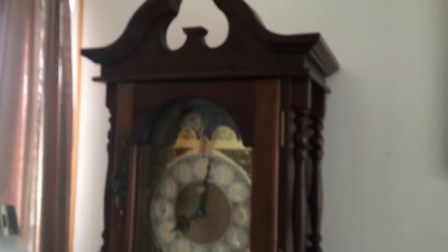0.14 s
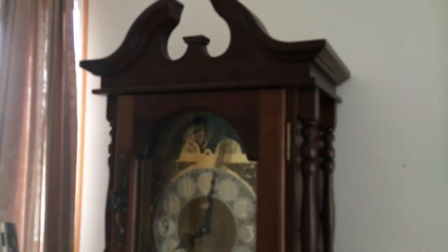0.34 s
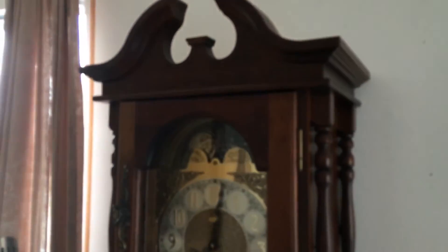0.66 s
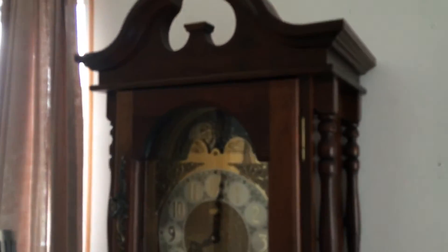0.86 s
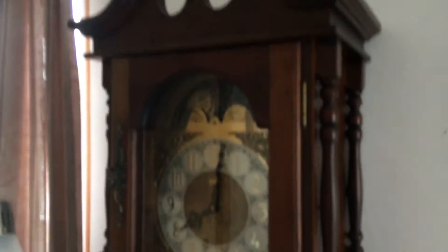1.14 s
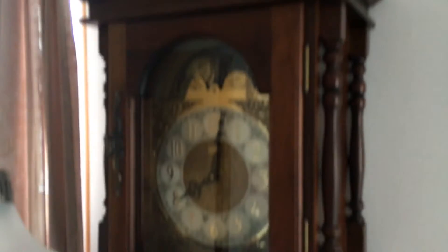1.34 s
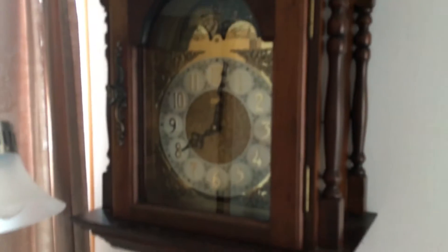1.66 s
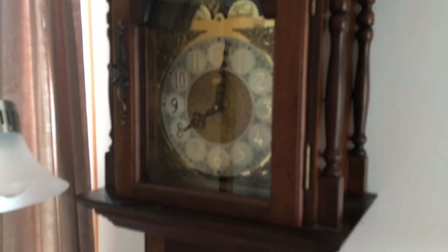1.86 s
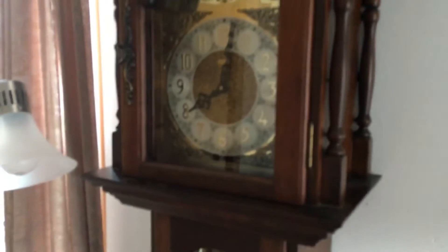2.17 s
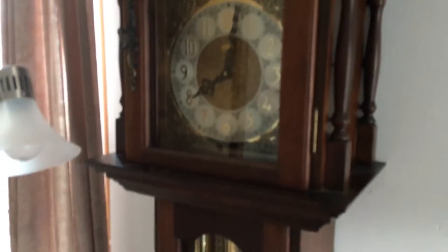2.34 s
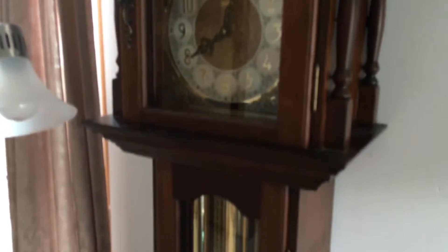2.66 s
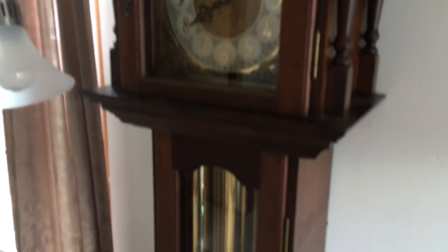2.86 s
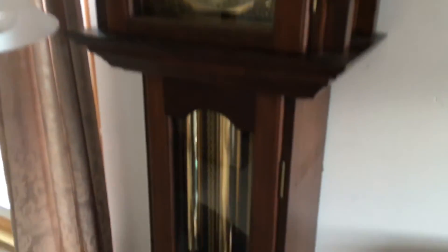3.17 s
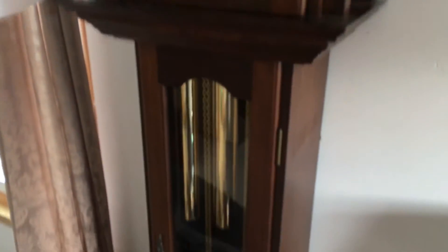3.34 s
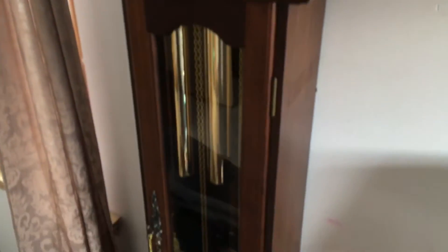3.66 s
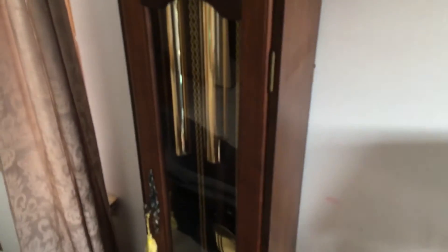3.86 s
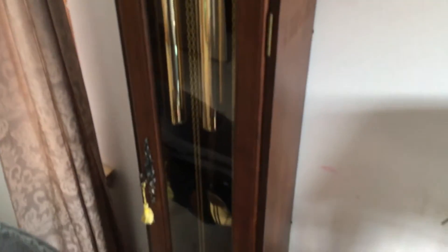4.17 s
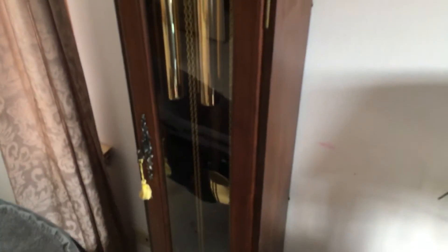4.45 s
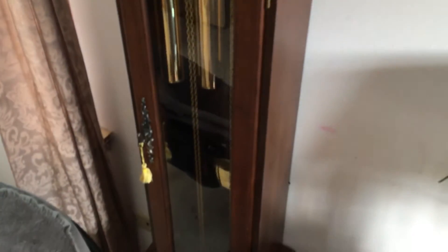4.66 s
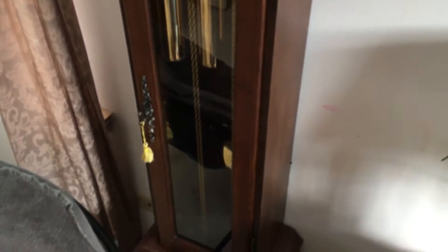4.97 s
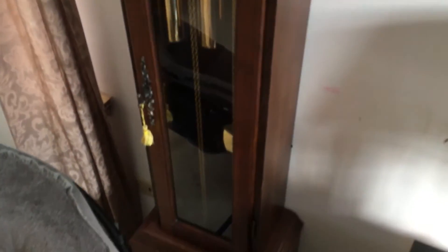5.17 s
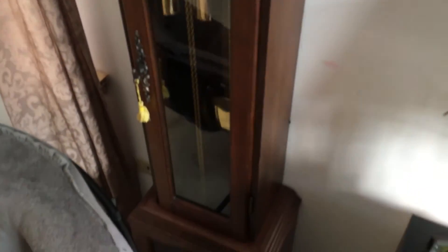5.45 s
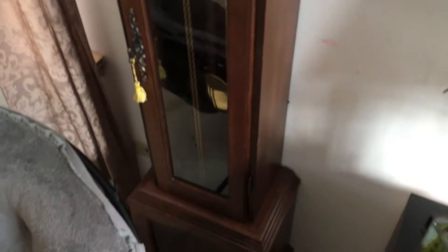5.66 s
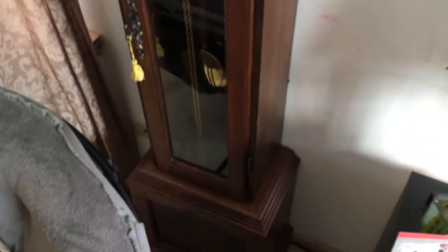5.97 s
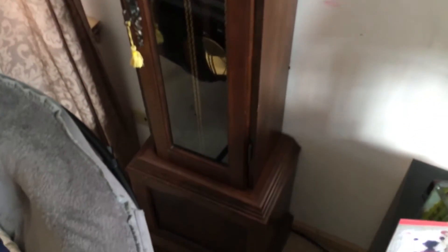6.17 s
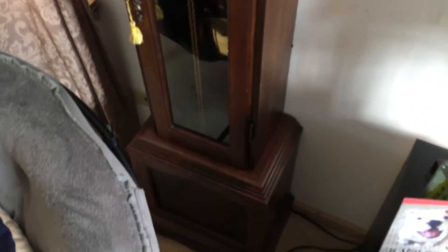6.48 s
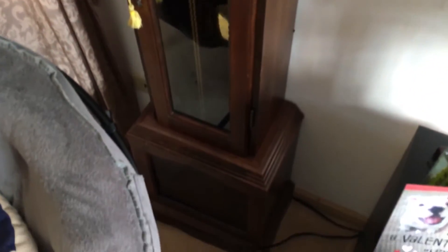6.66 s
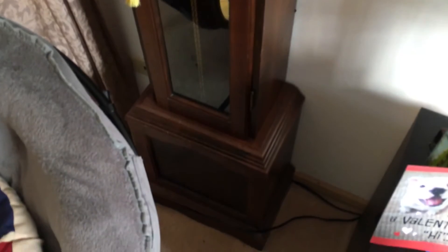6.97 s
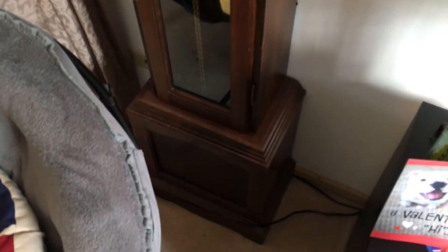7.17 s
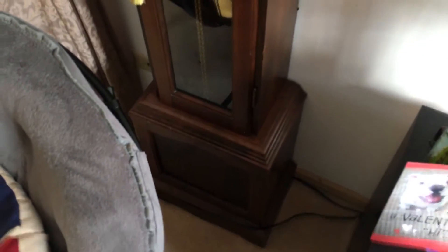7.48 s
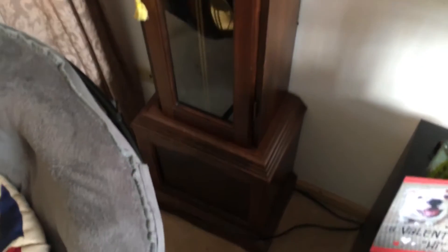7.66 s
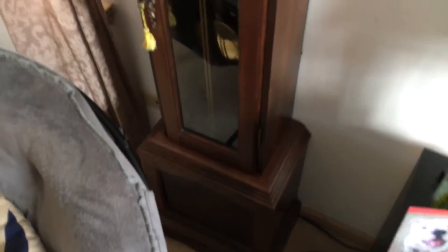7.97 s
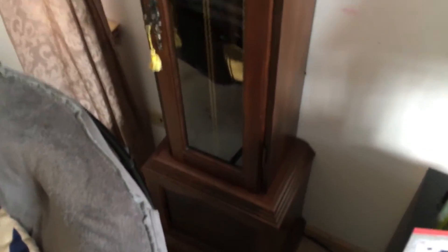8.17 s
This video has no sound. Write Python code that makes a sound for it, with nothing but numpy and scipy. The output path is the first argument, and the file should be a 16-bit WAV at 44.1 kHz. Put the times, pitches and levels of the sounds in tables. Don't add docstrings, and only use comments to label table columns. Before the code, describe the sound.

Low drifting room rumble and faint, even microphone hiss run throughout. A tall pendulum clock beats indoors: brighter, rattly multi-contact ticks at about 0.4, 2.2, 4.0, 5.8 and 7.6 s, softer hollow ringing tocks at 1.0, 2.8, 4.6, 6.4 and 8.3 s, each with a short room tail. The first are faint; those after 4 s are stronger. A tiny distant battery clock steps barely audibly around 0.4, 2.4, 4.4, 5.4 and 6.4 s. At 1.8 s skin snaps off plastic, then deep palm thumps and loud close knocks at 1.9-2.25 s, rubbing, and another hard cluster near 2.7 s. A small tap and bump come at 3.3-3.4 s. Calm ticking follows until 7.5 s, when a loose flap clacks dully then brightly, with an airy peel. Final knocks and low thumps hit at 8.1 and 8.2 s.

```python
import sys
import numpy as np
from scipy import signal
from scipy.fft import rfft, irfft, next_fast_len
from scipy.io import wavfile
from scipy.ndimage import map_coordinates

SR = 44100
rng = np.random.default_rng(int(sys.argv[2]) if len(sys.argv) > 2 else 0)


def wav_out(sig):
    wavfile.write(sys.argv[1], SR, np.round(np.clip(np.atleast_2d(sig).T, -1, 1) * 32767).astype(np.int16))


def gain_from_decibels(decibels):
    exponent = np.asarray(decibels, float) / 20
    return 10 ** exponent


N = 367044

# delay t/s, level/dB
REBOUNDS = [
    (0, 0.5),
    (.006, 5.5),
    (.011, -3.5),
    (.02, 0),
]
# t/s, peak level/dB, length t/s, hardness f/Hz, shell ring over knock level/dB
KNOCKS = [(2.1054, -21, 0.029, 2700, -29), (2.118, -33, 0.029, 900, -25), (2.1772, -25.5, 0.012, 1900, -14),
          (2.356, -41, 0.003, 1800, -11), (2.57, -42, 0.0066, 400, -25), (2.6868, -29, 0.0069, 2500, 2.5),
          (2.694, -25, 0.034, 900, -22), (2.7143, -30, 0.033, 1500, -0.5), (3.317, -56, 0.0075, 600, -3),
          (3.4, -45.5, 0.011, 500, -25), (7.5281, -27, 0.0029, 1800, -3.5), (7.535, -31, 0.023, 243, -25),
          (8.0711, -21, 0.023, 1440, -10), (8.0755, -39.5, 0.0044, 1200, -10),
          (8.087, -34.5, 0.0072, 1000, -19), (8.2051, -24, 0.034, 2560, -7.5),
          (8.243, -26.5, 0.0048, 2490, -3.5), (8.248, -32, 0.0042, 700, -15)]


def unit(x):
    return x / np.sqrt(np.mean(x ** 2) + 1e-20)


def along(points, hz):
    f, value = np.transpose(points)
    return np.interp(np.log(hz + 1), np.log(f + 1), value)


def filtered(x, response):
    m = next_fast_len(len(x) + SR // 2)
    spectrum = rfft(x, m) * response(np.fft.rfftfreq(m, 1 / SR))
    return irfft(spectrum, m)[:len(x)]


def peak(f, centre_hz, width_hz):
    return 1j * f * width_hz / (centre_hz ** 2 - f * f + 1j * f * width_hz + 1e-9)


def noise(spectrum):
    return unit(filtered(rng.standard_normal(N), lambda hz: gain_from_decibels(along(spectrum, hz))))


def wobble(rate):
    knots = rng.standard_normal(int(N * rate / SR) + 4)
    return map_coordinates(knots, [np.arange(N) * rate / SR])


def add(track, s, sound):
    part = track[round(s * SR):][:len(sound)]
    part += sound[:len(part)]


def background():
    # f/Hz, level/dB per Hz
    rumble_colour = [(12, -38), (22, -8), (48, 3), (70, -7.5), (110, -10), (160, -21.5), (280, -24),
                     (400, -21), (550, -30.5), (900, -49.5)]
    # f/Hz, level/dB per Hz
    hiss_colour = [(100, -8), (500, 3), (1000, 3.5), (2000, 0.5), (4000, -1.5), (6500, -5.5), (9000, -6.5),
                   (12000, -9.5), (15700, -17.5)]
    # f/Hz, width f/Hz, level/dB
    port_dips = [(4990, 290, -3.5), (7670, 600, -2.5), (10400, 370, -6.5)]

    def port(hz):
        return gain_from_decibels(sum(db * np.exp(-((hz - centre) / width) ** 2) for centre, width, db in port_dips))

    drift_db = 0.56 * wobble(3.2) + 1.1 * wobble(13.0)
    rumble = gain_from_decibels(-58 + drift_db) * noise(rumble_colour)
    hiss = gain_from_decibels(-69.5) * filtered(noise(hiss_colour), port)
    return rumble + hiss


def room_tail():
    # f/Hz, t60 t/s
    room_decay = [(800, 0.21), (1800, 0.24), (5000, 0.066)]
    hz, t, z = signal.stft(rng.standard_normal(SR // 2), SR, nperseg=256)
    decay = gain_from_decibels(-60 * t / along(room_decay, hz)[:, None])
    tail = signal.istft(z * decay, SR, nperseg=256)[1]
    return tail / np.linalg.norm(tail)


def beats(events, body, contacts, view, lead_s, wet_db, rattle_db, trim_db):
    # t/s, turn (0 facing, 1 away)
    camera_turn = [(.4, 0.022), (1.0, 0.074), (2.5, 0.43), (4.3, .65), (6.1, 0.99), (7.9, 0.62)]
    # f/Hz, level/dB per Hz
    rattle_colour = [(500, -32), (900, -8.5), (1500, -5), (2200, -2), (3000, -8.5), (4500, -29)]
    recoil_s, recoil_db = 0.038, -9
    edge_hz, edge_t60_s = 3100, 0.028
    size = SR // 2
    t = np.arange(size) / SR
    out, tail = np.zeros(N), room_tail()

    def ring(f):
        modes = enumerate(body)
        return sum((-1) ** k * gain_from_decibels(db) * peak(f, hz, width) for k, (hz, width, db) in modes)

    for s, db in events:
        turn = np.interp(s, *np.transpose(camera_turn))
        boom_db, plate_db, edge_db = np.add(view[0], turn * np.array(view[1]))

        blows = np.zeros(size)
        blows[0] = gain_from_decibels(-16)
        for delay, blow_db in contacts:
            blows[round((lead_s + delay) * SR)] = gain_from_decibels(blow_db + rng.normal(0, 1))
        shake = gain_from_decibels(-60 * t / 0.1) * rng.standard_normal(size)
        rattle = unit(filtered(shake, lambda f: gain_from_decibels(along(rattle_colour, f))))
        direct = unit(filtered(blows, ring)) + gain_from_decibels(rattle_db) * rattle
        direct *= gain_from_decibels(recoil_db / (1 + np.exp((lead_s + recoil_s - t) / 0.0037)))

        heard = direct + gain_from_decibels(wet_db) * signal.fftconvolve(direct, tail)[:size]
        heard /= np.sqrt(np.mean(heard[:SR // 40] ** 2))
        colour = [(950, boom_db + 16), (1100, plate_db + 6.0), (1450, plate_db + 17), (1600, 0)]
        coloured = filtered(heard, lambda f: gain_from_decibels(along(colour, f)))
        add(out, s - lead_s, gain_from_decibels(db + trim_db) * coloured)

        burst = gain_from_decibels(-60 * t / edge_t60_s) * rng.standard_normal(size)
        edge = filtered(burst, lambda f: peak(f, edge_hz, 450) ** 2)
        add(out, s, gain_from_decibels(db + edge_db + 4.5) * edge / abs(edge).max())
    return out


def pendulum_ticks():
    # t/s, peak level/dB
    ticks = [
        (0.3672, -52),
        (2.1612, -48.5),
        (3.9775, -44.5),
        (5.7972, -44.5),
        (7.6155, -46),
    ]
    # f/Hz, width f/Hz, level/dB
    tick_body = [(876, 37, -12), (1090, 60, -5), (1320, 45, -1), (1552, 23, 4), (1781, 19, 4),
                 (2020, 81, 1.5), (2150, 81, 6), (2320, 29, -1), (2490, 69, 0), (2630, 40, -25),
                 (3005, 20, -10), (3130, 55, -6)]
    # delay t/s, level/dB
    tick_rebounds = [
        (0, 0.5),
        (.005, -2),
        (.01, 5.5),
        (.022, 1),
    ]
    # case boom level/dB, plate level/dB, bright edge level/dB
    tick_view = [(-5.5, -4.5, -7), (-6, -5, -19)]
    return beats(ticks, tick_body, tick_rebounds, tick_view,
                 lead_s=0.0007, wet_db=-6.5, rattle_db=-7.0, trim_db=-14.0)


def battery_clock():
    # t/s, peak level/dB
    steps = [
        (.4, -70.5),
        (2.399, -67),
        (4.399, -69),
        (5.399, -74),
        (6.401, -66.5),
    ]
    # f/Hz, width f/Hz, level/dB
    step_body = [(615, 20, -8), (1690, 120, -7), (1800, 78, -3), (2080, 160, -12.5)]
    # case boom level/dB, plate level/dB, bright edge level/dB
    step_view = [(-10, -14, -34), (-4, -2, -1.5)]
    return beats(steps, step_body, REBOUNDS[:2], step_view,
                 lead_s=0.015, wet_db=1.0, rattle_db=-10, trim_db=-2.5)


def pendulum_tocks():
    # t/s, peak level/dB
    tocks = [
        (1.0145, -55),
        (2.8085, -52),
        (4.6232, -51),
        (6.4411, -50.5),
        (8.2555, -51.5),
    ]
    # f/Hz, width f/Hz, level/dB
    tock_body = [(841, 9.4, 1), (990, 23, -10.5), (1100, 85, -10.5), (1237, 85, -5), (1763.5, 18.4, 7.5),
                 (1920, 12, -27), (2244, 58, -6.5), (2440, 15, -14), (2900, 7.3, -1), (2955, 81, -19),
                 (3400, 83, -35), (4500, 84, -24)]
    # case boom level/dB, plate level/dB, bright edge level/dB
    tock_view = [(-12, -9, -1.5), (-1, -7.5, -20)]
    return beats(tocks, tock_body, REBOUNDS, tock_view,
                 lead_s=0.00119, wet_db=-5.5, rattle_db=-8, trim_db=-5.5)


def skin_snaps():
    # t/s, peak level/dB, t60 t/s, centre f/Hz
    peels = [
        (1.77, -67, 0.1, 7000),
        (7.49, -66, 0.38, 10000),
        (7.508, -55, 0.04, 9000),
        (7.54, -53, 0.082, 2190),
    ]
    # t/s, peak level/dB, centre f/Hz
    snaps = [(1.775, -51.5, 8950), (1.775, -49, 4000), (2.234, -68, 5000), (2.279, -67, 7000),
             (2.339, -58, 7000), (2.708, -61, 4000), (2.711, -49, 4500), (2.716, -49, 3500),
             (3.317, -55, 6900), (7.506, -50, 3500), (7.527, -49, 7000), (7.537, -56, 9000)]
    snap_t60_s = 0.0066
    crack_db, crack_t60_s, crack_hz = -26.5, 0.0093, 4000
    nail_hz = 2500
    out, t = np.zeros(N), np.arange(SR // 10) / SR

    bursts = [(s, db, snap_t60_s, hz) for s, db, hz in snaps] + list(peels)
    for s, db, _, hard_hz, _ in KNOCKS:
        hardness_db = 20 * np.log10(hard_hz / nail_hz)
        bursts.append((s, db + crack_db + hardness_db, crack_t60_s, crack_hz))
    for s, db, t60, centre_hz in bursts:
        burst = gain_from_decibels(db + 4.0 - 60 * t / t60) * rng.standard_normal(len(t))
        add(out, s, filtered(burst, lambda f: peak(f, centre_hz, 0.51 * centre_hz)))
    return out


def palm_shoves():
    # t/s, peak level/dB, f/Hz, swings
    shoves = [(1.891, -38.5, 60, 0.35), (1.917, -31, 32.3, 0.77), (1.965, -40.5, 30, 1),
              (2.024, -33.5, 70, 0.57), (2.034, -25.5, 29.8, 1.08), (2.171, -31.5, 30, 0.31),
              (2.198, -26.5, 51.6, .56), (2.25, -40, 33, 2.2), (2.655, -36, 65, 0.83),
              (3.355, -40, 45, 1.2), (3.424, -46, 48, 0.89), (7.571, -42, 31.8, 1), (8.094, -25, 52, 0.53),
              (8.133, -40, 30, 0.45), (8.262, -37, 45, 0.83)]
    sag, linger = 0.18, 1.38
    t, out = np.arange(N) / SR, np.zeros(N)
    for s, db, hz, swings in shoves:
        cycles = hz * (t - s)
        spread = swings * np.where(cycles > 0, linger, 1)
        swell = np.exp(-(cycles / spread) ** 2)
        out += gain_from_decibels(db) * swell * np.cos(2 * np.pi * (cycles - sag * cycles * cycles))
    return out


def rubbing():
    # t/s, level/dB
    pressure = [
        (2.1, -49),
        (2.2, -67),
        (2.342, -54),
        (2.5, -53.5),
        (2.6, -55.5),
        (2.67, -48.5),
        (2.8, -82),
    ]
    # f/Hz, level/dB per Hz
    drag_colour = [(20, -18), (60, 4), (200, -5), (500, -21.5), (1200, -28.5), (3000, -69)]
    scuff_colour = [(200, -20), (400, -4), (1100, -24), (2000, -50)]
    chafe_colour = [(400, -16), (800, 2), (1300, 0), (3500, -16), (6000, -40)]
    s, db = np.transpose(pressure)
    press_db = np.interp(np.arange(N) / SR, s, db, left=-120, right=-120)

    drag = unit(gain_from_decibels(3.7 * wobble(60)) * noise(drag_colour))
    scuff = unit(gain_from_decibels(5.5 * wobble(76)) * noise(scuff_colour))
    chafe = unit(gain_from_decibels(5.8 * wobble(110)) * noise(chafe_colour))
    chafe_db = -67 + 1.9 * (press_db - db[-2])
    return gain_from_decibels(press_db) * (drag + gain_from_decibels(-17.5) * scuff) + gain_from_decibels(chafe_db) * chafe


def finger_knocks():
    slowness, soft_hz = 0.84, 190
    out, t = np.zeros(N), np.arange(SR // 6) / SR
    for s, db, length, hard_hz, _ in KNOCKS:
        turns = ((1000 * t / (slowness + soft_hz / hard_hz)) ** 0.23 - 1.1) / 0.5
        shape = (1 - np.exp(-t / 0.00066)) * np.exp(-(t / length) ** 3.7)
        thump = shape * np.cos(2 * np.pi * turns)
        add(out, s, gain_from_decibels(db) * filtered(thump, lambda f: 1 / (1 + 1.2j * f / hard_hz - (f / hard_hz) ** 2)))
    return out


def shell_rings():
    # f/Hz, level/dB, t60 t/s
    shell = [(1146, -0.5, 0.0064), (2400, -10.5, 0.007)]
    # f/Hz, level/dB, t60 t/s
    flap = [(384, -0.5, 0.025), (944, -8.5, 0.0073), (2560, -28, 0.0037)]
    # t/s, peak level/dB, added level/dB per higher mode
    flap_hits = [
        (2.7088, -38, 13),
        (3.318, -43, 10.5),
        (7.5068, -47, 8),
        (7.529, -27, 1),
        (7.5367, -27.5, 16),
    ]
    out, t = np.zeros(N), np.arange(SR // 6) / SR
    hits = [(s, db + ring_db, 0, shell) for s, db, _, _, ring_db in KNOCKS]
    hits += [(s, db, bright_db, flap) for s, db, bright_db in flap_hits]
    for s, db, bright_db, modes in hits:
        for k, (hz, level, t60) in enumerate(modes):
            decay = gain_from_decibels(db + level + k * bright_db - 60 * t / t60)
            onset = 1 - np.exp(-t * hz * 3)
            add(out, s, decay * onset * np.sin(2 * np.pi * hz * t))
    return out


def scene():
    clocks = pendulum_ticks() + battery_clock() + pendulum_tocks()
    hand = skin_snaps() + palm_shoves() + rubbing() + finger_knocks() + shell_rings()
    return (background() + clocks + hand)[None]


def low_pass(x):
    return signal.sosfilt(signal.butter(12, 15710, fs=SR, output="sos"), x)


def record(dry):
    mix = filtered(dry[0], lambda hz: hz < 15700)[None]
    return low_pass(mix)


dry = scene()
out = record(dry)
wav_out(out)
```